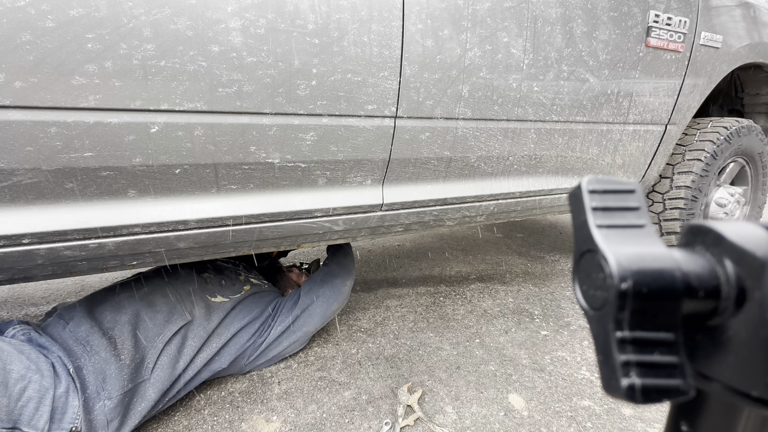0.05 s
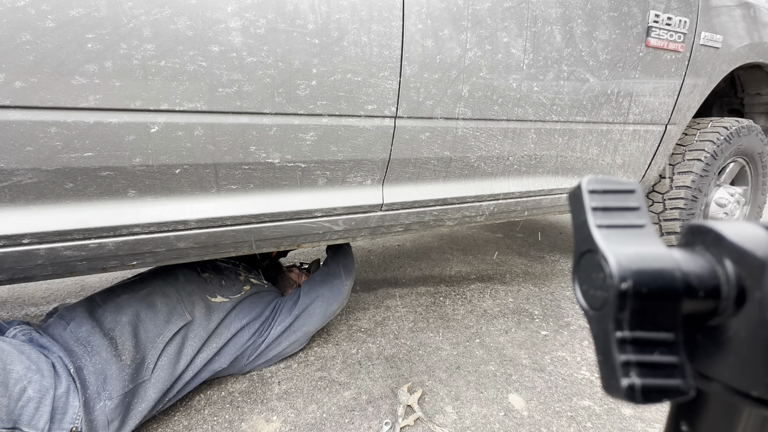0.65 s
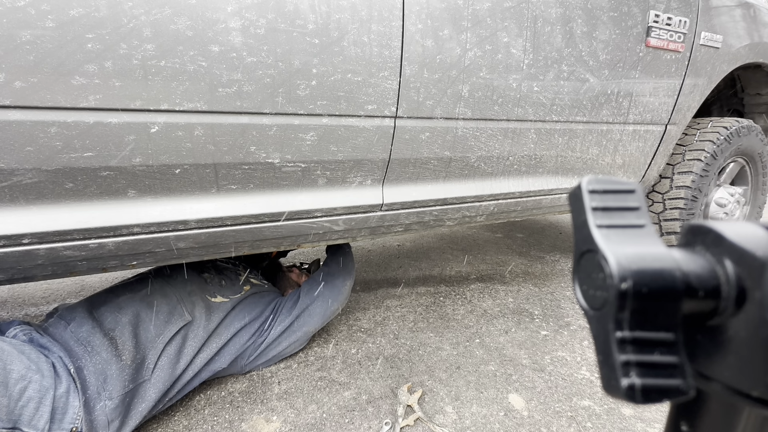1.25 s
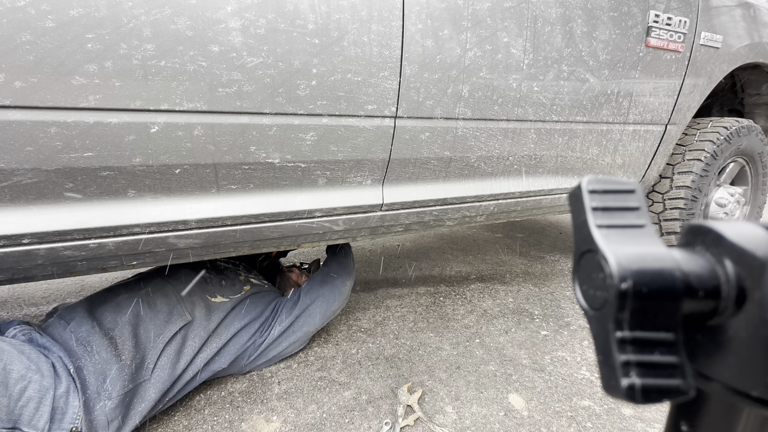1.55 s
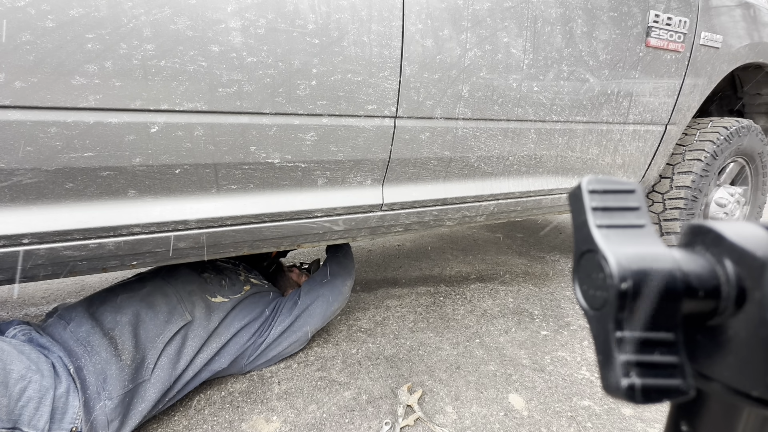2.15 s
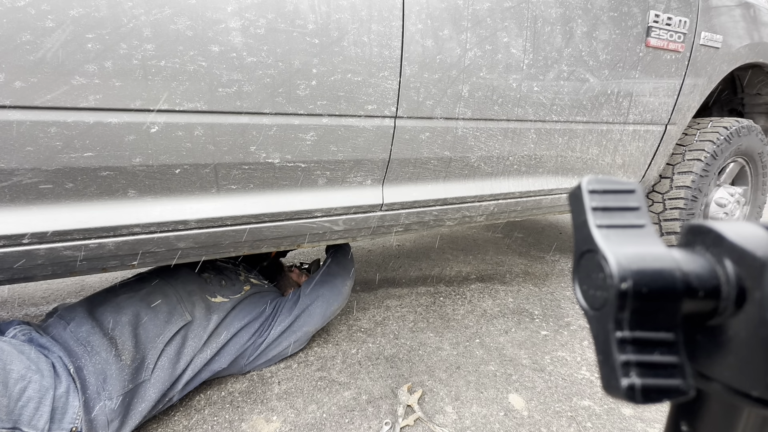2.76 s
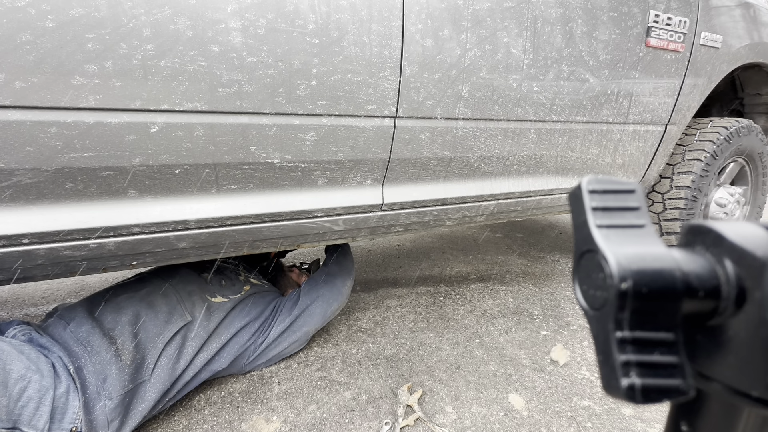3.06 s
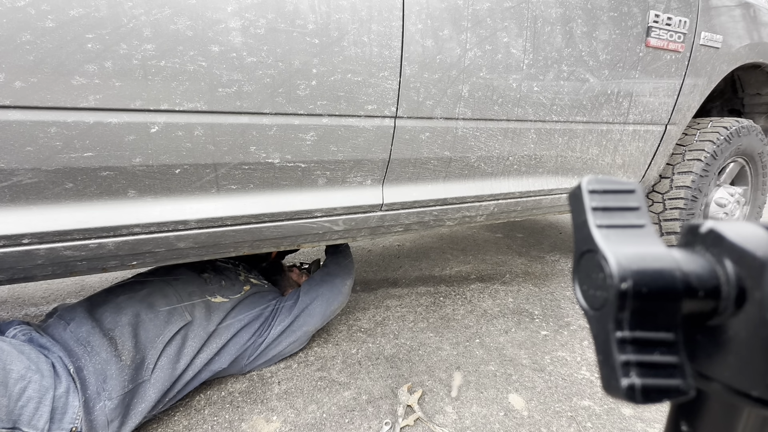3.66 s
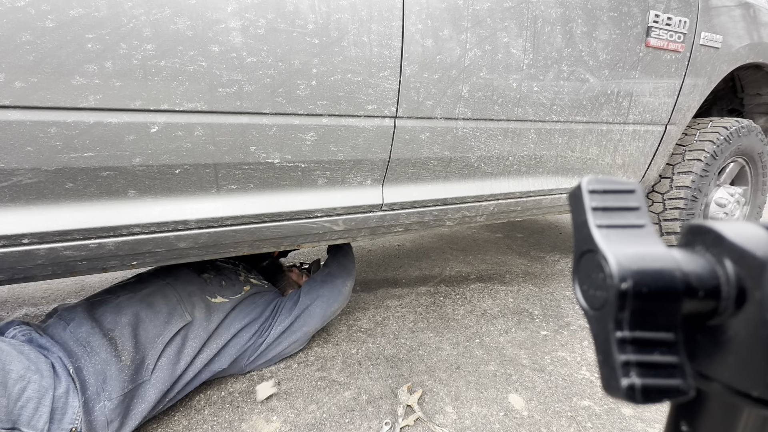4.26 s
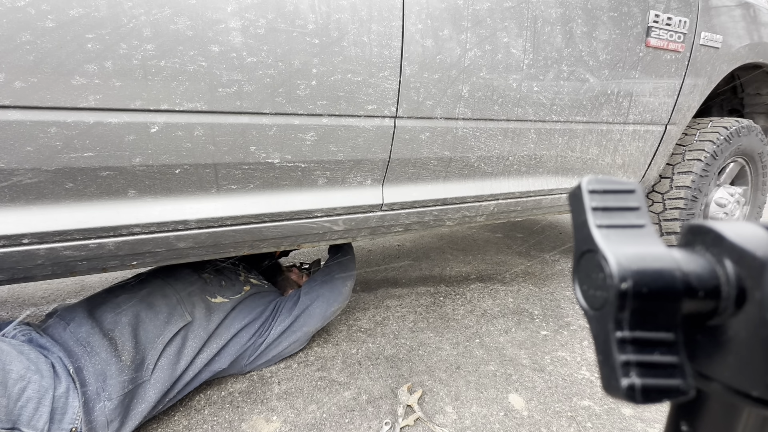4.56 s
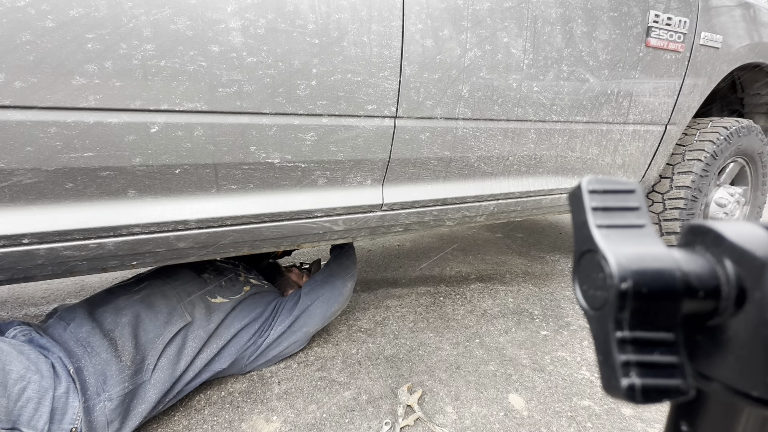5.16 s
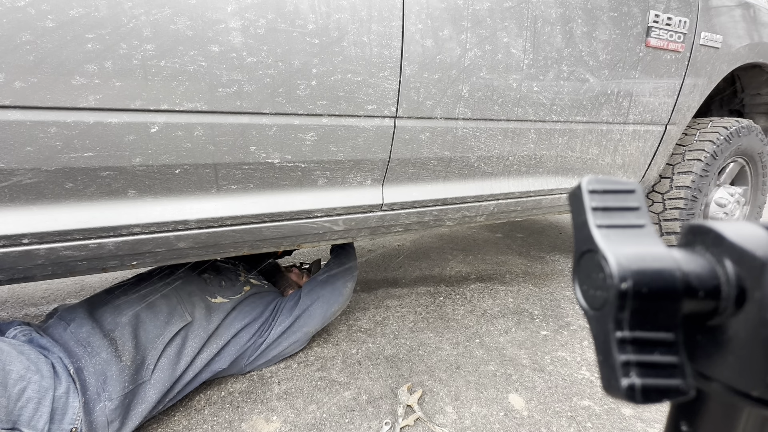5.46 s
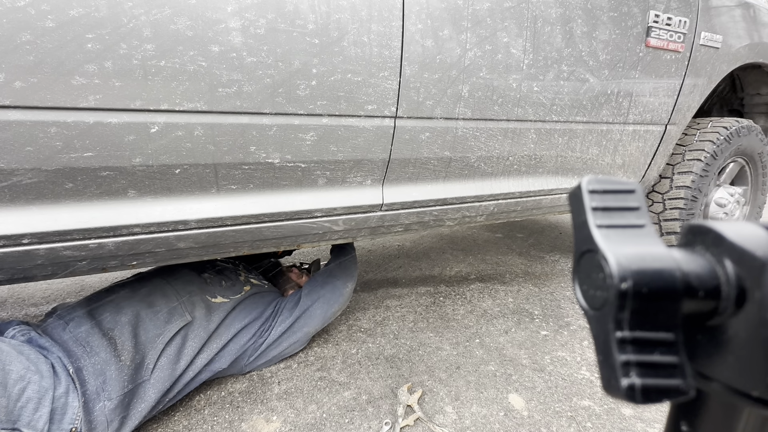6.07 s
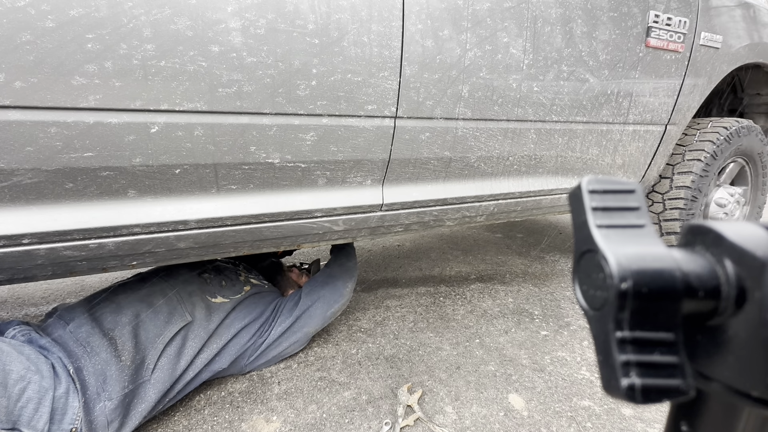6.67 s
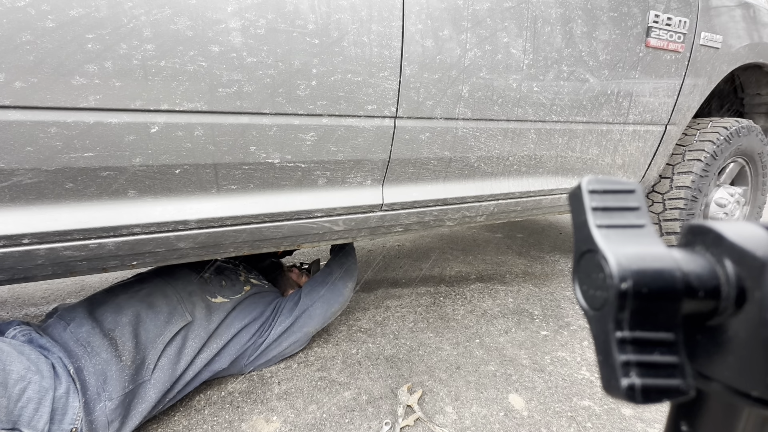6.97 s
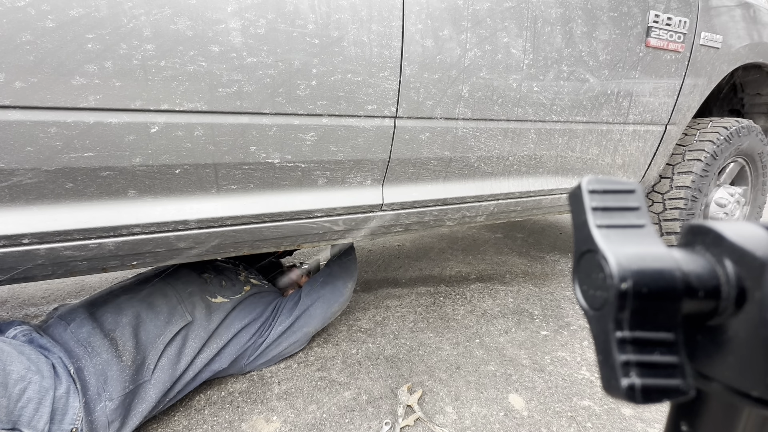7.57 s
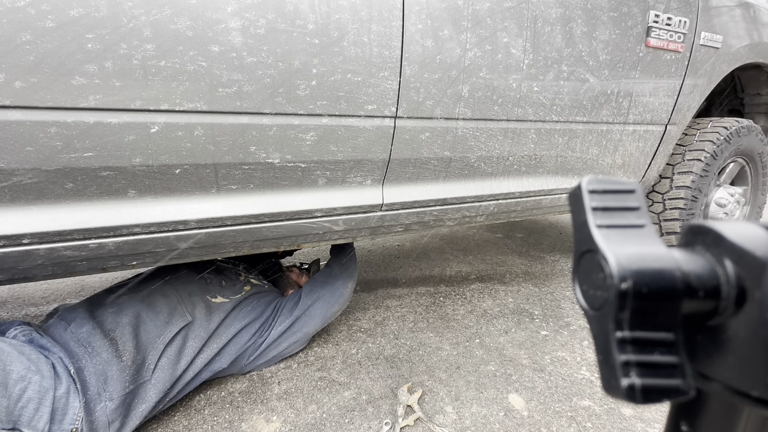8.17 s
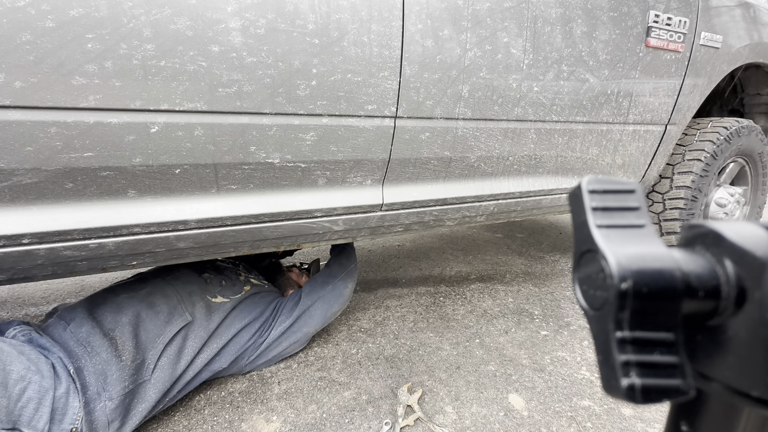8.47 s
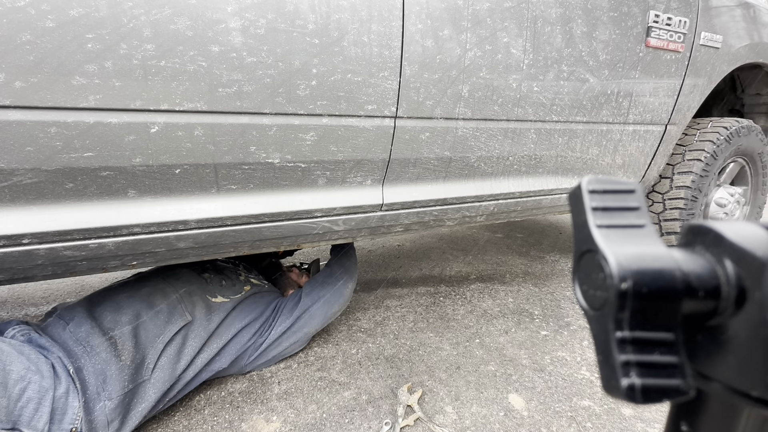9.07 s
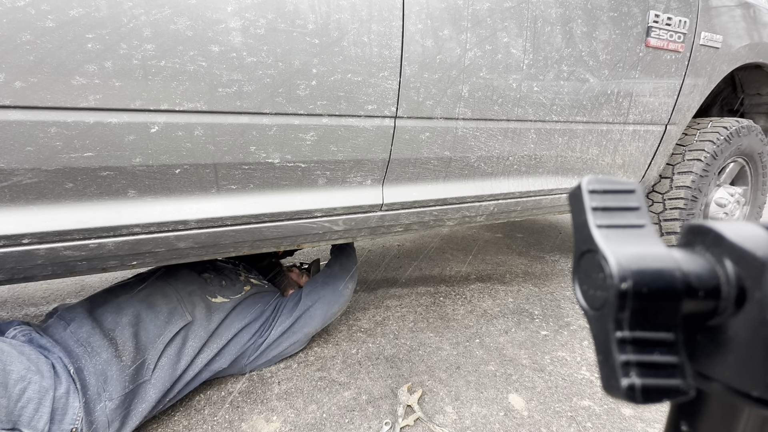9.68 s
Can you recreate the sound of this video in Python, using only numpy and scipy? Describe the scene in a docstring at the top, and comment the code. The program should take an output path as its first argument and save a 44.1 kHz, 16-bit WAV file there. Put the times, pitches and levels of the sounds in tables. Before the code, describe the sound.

Heard from beside a truck in a garage, a small saw grinds harshly into steel pipe, its motor slowing and recovering under load. It stops for about two seconds, leaving a metallic ring and some faint clicks. The saw restarts with a stutter, races up to a high squeal, then drops steadily in pitch as it rasps on. Light air rumbles faintly on the microphone.

```python
"""Power saw on a steel pipe

A small saw cuts a pipe under a parked truck. Its wheel rasps and knocks once a turn and slows as it
bites. It lifts off, grazes the pipe, which rings on, rests among a few light ticks, then spins up,
squeals and bogs down again. Each contact force is filtered by the resonances of the steel.
The underbody and the concrete scatter the sound; a light draught rumbles on the microphone."""
import sys
import numpy as np
from scipy import signal
from scipy.fft import rfft, irfft, next_fast_len
from scipy.io import wavfile
from scipy.ndimage import uniform_filter1d

SR = 44100
rng = np.random.default_rng(int(sys.argv[2]) if len(sys.argv) > 2 else 0)


def materialize(psi):
    """Save the field psi as 16-bit PCM at rate SR to the path in sys.argv[1].

    A 1-D psi becomes a single channel; in a 2-D psi each row is a channel.
    """
    bounded = np.clip(np.atleast_2d(psi).T, -1, 1)
    quanta = np.round(bounded * 32767).astype(np.int16)
    wavfile.write(sys.argv[1], SR, quanta)


N = 437031
T = np.arange(N) / SR
TOP_HZ = 15900  # band limit

# broad spectra of the three contact sounds: frequency_hz, density_db
RASP_SPECTRUM = [(1500, -31.5), (3000, -20), (4000, -15), (5000, -4.5), (5900, -6), (6700, -3), (7500, -1),
                 (8900, -7.5), (9700, -2), (10500, -14), (13000, -10.5), (15500, -13)]
CHATTER_SPECTRUM = [(600, -43.5), (1000, -10.5), (1400, -10.5), (1800, -11.5), (2300, -3), (2800, -6.5),
                    (3300, -7), (3700, -8.5), (4400, -9), (6500, -28)]
KNOCK_SPECTRUM = [(60, -33.5), (170, -21), (270, -19), (400, -18.5), (560, -9.5), (800, -1.5), (950, -9),
                  (1100, -10.5), (1400, -9.5), (2500, -49.5)]
# resonances of pipe and wheel, and of the pipe wall (first cut, grazes): centre_hz, width_hz, level_db
FIRST_STEEL_MODES = [(4180, 45, -3), (4398, 35, 2.5), (5297, 45, 3), (5445, 75, 3), (5830, 150, -2),
                     (6215, 100, 1), (7070, 60, 1), (7400, 70, 1), (7535, 50, 2), (8290, 190, 0),
                     (9400, 90, -1.5), (9750, 110, -4)]
FIRST_WALL_MODES = [(1385, 36, -6), (1650, 70, -.5), (1950, 130, -4), (2220, 130, -2.5), (2465, 24, 1.5),
                    (2868, 15, -1), (3700, 190, -2), (3860, 23, -2)]
# when the wheel is in the pipe: start_s, stop_s
FIRST_SPAN = (0, 2.994)
SECOND_SPAN = (5.405, 9.91)


def cut(speed, swell, span, steel, wall, body, steel_db, wall_db, body_db,
        rasp_db, chatter_db, knock_db, motor_db):
    """Forced vibration: chips rasp the steel, the rim chatters, a high spot knocks once a turn."""
    # part of the rasp's power that drives the squeal: time_s, share
    squeal_shares = [(6.42, 0), (6.53, .92), (6.68, .9), (6.78, .45), (6.92, .35), (6.99, .88), (7.08, .85),
                     (7.16, 0)]
    # motor and cooling fan shaking the pipe: shaft_multiple, level_db
    motor_orders = [(3, -11), (4, -11), (5, -6), (6, 0), (7, -4), (8, -4), (9, -8), (10, -8), (12, -6)]
    start, stop = span
    turns = np.cumsum(speed) / SR  # speed is in turns per second
    turns -= np.interp(start, T, turns)
    contact = (T >= start) * amp(-330 * np.clip(T - stop, 0, 1))
    hopping = np.clip((40 - speed) / 13, 0, 1)  # a slow wheel hops on the pipe
    seated = load(speed) * (1 - hopping)
    # speed and load set the levels, and how much repeats from turn to turn
    octaves = np.log2(speed / 60)
    steady = np.clip(seated * (.77 + .14 * octaves), 0, 1)
    rasp_swell_db, shake_swell_db = curves(swell)
    rasp = contact * amp(rasp_swell_db + 5 * octaves)
    chatter = contact * amp(shake_swell_db + 4 * octaves + 5 * (1 - seated) + hand_db())
    knock = contact * amp(shake_swell_db - 1.3 * octaves - 2 * (1 - seated) + hand_db())
    # the bite is hardest at the start of each turn
    hop_db = 3.5 + 15 * hopping
    bite = amp(hop_db * (1 - turns % 1) - 7 * hopping + .74 * wobble(35))
    edge, chips = rim(turns), grit(spiky_db=1.5)
    blows = high_spot(turns, scatter_s=15e-6, uneven_db=.5)
    # the lower the band, the more of it repeats
    scraping = blend(abrasive(turns, speed), grit(spiky_db=3), .7 * steady ** 2)
    hiss = sliding_resonances(rasp * bite * scraping, RASP_SPECTRUM, steel, steel_db)
    clatter = coloured(chatter * bite * blend(edge, chips, steady ** 2), CHATTER_SPECTRUM, wall, wall_db)
    pounding = blend(blows, bite * chips, 1 - (1 - steady) ** 2)
    thud = coloured(knock * pounding, KNOCK_SPECTRUM, body, body_db)
    honk = honks(contact * blend(blows, chips, 1 - (1 - steady) ** 3))
    singing = curves(squeal_shares)[0] * (T < stop)
    hiss = hiss * np.sqrt(1 - singing) + squeal(turns, rasp * np.sqrt(singing), speed)
    drone = coloured(knock * steady * shaft_tones(turns, motor_orders), KNOCK_SPECTRUM, body, body_db)
    return (amp(rasp_db) * hiss + amp(chatter_db) * clatter + amp(knock_db) * thud
            + amp(motor_db) * drone + honk)


def soft_start(speed, crawl_hz=26.8, ramp_start_s=5.66, octaves_per_s=2.75):
    """Exponential run-up: the motor crawls, then climbs to the speed that the cut allows."""
    return np.minimum(speed, crawl_hz * 2 ** (octaves_per_s * np.maximum(T - ramp_start_s, 0)))


def load(speed, free_octaves_per_s=2.7):
    """Cutting load, 0-1: a wheel gathers speed only when it is let off."""
    climb = uniform_filter1d(np.gradient(np.log2(speed)) * SR, size=SR // 8)
    return np.exp(-(np.maximum(climb, 0) / free_octaves_per_s) ** 2)


def hand_db():
    """Amplitude modulation: an unsteady hand makes the level waver."""
    return .6 * wobble(8)


def rim(turns, lowest_order=2, count=115, size=8192):
    """Periodic excitation: the edge's bumps recur each turn; rocking trades one flank for the other."""
    harmonics = np.pad(np.exp(2j * np.pi * rng.random((2, count))), ((0, 0), (lowest_order, 0)))
    inner, outer = irfft(harmonics, size)[:, (turns % 1 * (size - 1)).astype(int)]
    lean = .82 * wobble(3)
    return unit(np.cos(lean) * inner + np.sin(lean) * outer)


def abrasive(turns, speed, count=100):
    """Surface roughness: four grades of grit give a flat spectrum; the finest is heard at low speed."""
    grades = (np.clip((TOP_HZ + 1000 - order * speed) / 1000, 0, 1) * rim(turns, order, count)
              for order in range(0, 4 * count, count))
    return sum(grades) * np.sqrt(2 * count * speed / SR)


def grit(spiky_db):
    """Random excitation: countless tiny chips of uneven size add up to noise."""
    return unit(rng.standard_normal(N) * amp(spiky_db * wobble(2500)))


def high_spot(turns, scatter_s, uneven_db):
    """Impulse train: one blow for each turn of the wheel, at even mean power."""
    times = np.interp(np.arange(1, int(turns[-1])), turns, T)
    jitter = rng.standard_normal((len(times), 2))
    strength = np.sqrt(np.gradient(times) * SR) * amp(uneven_db * jitter[:, 0])
    place = (times + scatter_s * jitter[:, 1]) * SR
    taps = place.astype(int)[:, None] + np.arange(-7, 9)
    pulses = strength[:, None] * np.sinc(taps - place[:, None])  # blows fall between samples
    return np.bincount(np.clip(taps, 0, N).ravel(), pulses.ravel(), N + 1)[:N]


def sliding_resonances(x, spectrum, modes, modes_db, slide=.0035):
    """Changing boundary conditions: slot and grip shift the steel's resonances up and down a little."""
    low, high = (coloured(x, spectrum, [(hz * ratio, width, db) for hz, width, db in modes], modes_db)
                 for ratio in (1 - slide, 1 + slide))
    lean = .5 + .5 * np.tanh(1.5 * wobble(5))
    return lean * high + (1 - lean) * low


def squeal(turns, force, speed):
    """Friction-driven resonance: the racing rim squeals in the slot; at top speed it also screeches."""
    # broad spectrum of the squeal: frequency_hz, density_db
    spectrum = [(1200, -23), (2200, -17), (3300, -15), (4200, -11), (4900, -12), (5600, -5), (6700, -10),
                (7400, -5), (9300, -8), (12000, -17)]
    # steel resonances that it excites: centre_hz, width_hz, level_db
    modes = [(4010, 45, -5), (4400, 55, -5), (5420, 70, 4), (5830, 80, 2), (6200, 90, 0), (7110, 65, 4)]
    # the rim's strongest tones: shaft_multiple, level_db
    screech_orders = [(31, -5), (34, -3), (42, 0), (45, 1), (47, -1), (48, -2), (54, -1), (55, -1)]
    if not force.any():
        return 0
    racing = np.clip((speed - 117) / 11, 0, 1)
    singing = coloured(force * rim(turns), spectrum, modes)
    screech = force * racing * shaft_tones(turns, screech_orders)
    return amp(-.3) * singing + amp(-6) * screech


def shaft_tones(turns, orders):
    """Rotational harmonics: tones locked to the shaft, each swelling and fading on its own."""
    angle = (2 * np.pi * (turns % 1)).astype(np.float32)
    return unit(sum(amp(db + 2.1 * wobble(4)) * np.sin(round(order) * angle) for order, db in orders))


def honks(drive, edge_s=.036):
    """Band-pass resonance: for a spell during the cut, one band of the pipe's sound swells and honks."""
    # spells in which one band swells: start_s, length_s, level_db, centre_hz, width_hz
    spells = [(0, .37, -38.5, 820, 90), (.1, .33, -52, 300, 110), (.5, .5, -44, 735, 120),
              (.95, .45, -55, 255, 30), (1.15, .3, -39, 4410, 130), (1.42, .52, -40.5, 825, 80),
              (1.45, .4, -40, 2000, 350), (1.95, .15, -44, 780, 120), (2.12, .33, -36, 825, 120),
              (2.52, .3, -44, 730, 170), (6.7, .25, -38, 1700, 450), (6.73, .22, -30.5, 3800, 600),
              (7.2, .22, -38, 1570, 130), (7.25, .85, -36.5, 770, 80), (7.55, .5, -43, 560, 70),
              (7.65, .4, -37.5, 1385, 90), (8.05, .4, -42, 700, 120), (8.2, .27, -36.5, 2290, 200),
              (8.28, .26, -57, 228, 30), (8.52, .3, -44, 570, 70), (8.8, .2, -39, 2300, 160),
              (9.1, .52, -41.5, 770, 130), (9.26, .22, -51, 345, 30)]
    out = np.zeros(N)
    for start, length, db, hz, width_hz in spells:
        part = slice(max(int((start - .1) * SR), 0), int((start + length + .2) * SR))
        envelope = np.clip(np.minimum(T[part] - start, start + length - T[part]) / edge_s + .5, 0, 1)
        b, a = signal.iirpeak(hz, hz / width_hz, SR)
        ring = signal.lfilter(b, a, signal.lfilter(b, a, envelope * drive[part]))
        out[part] += amp(db) * np.sqrt(2 * SR / (np.pi * width_hz)) * ring
    return out


def grazes(rise_s=.0015):
    """Transient excitation: the wheel catches the pipe; the briefer the catch, the quicker it fades."""
    # catches of the wheel: start_s, length_s, rasp_db, chatter_db, knock_db
    catches = [(1.317, 0.0012, -23, -22, -62), (3.121, 0.0076, -46, -38.5, -37),
               (3.211, 0.018, -45, -46, -48), (3.231, 0.036, -27, -35.5, -50),
               (3.278, 0.012, -25, -38, -50), (3.295, 0.013, -44, -37.5, -55),
               (5.269, 0.019, -53.5, -55.5, -51), (5.36, 0.022, -68, -69, -74),
               (5.59, 0.0066, -32, -48, -60), (5.634, 0.0064, -27.5, -37, -61),
               (5.749, .004, -22, -38, -64), (5.778, 0.0091, -23.5, -33, -64),
               (5.845, 0.0012, -17, -27, -62), (5.954, .002, -24, -44, -62), (6.02, 0.0022, -20, -37, -62),
               (6.81, .002, -23, -24.5, -50)]
    power, t = np.zeros((3, N)), T[:SR // 4]
    for start, length, *levels_db in catches:
        fall_db_per_s = 400 * (1 + .004 / length)
        shape = np.clip(t / rise_s, 0, 1) * amp(-fall_db_per_s * np.maximum(t - length, 0))
        power[:, round(start * SR):][:, :len(t)] += (amp(levels_db)[:, None] * shape) ** 2
    rasp, chatter, knock = np.sqrt(power) * grit(spiky_db=4)
    return (coloured(rasp, RASP_SPECTRUM, FIRST_STEEL_MODES)
            + coloured(chatter, CHATTER_SPECTRUM, FIRST_WALL_MODES) + coloured(knock, KNOCK_SPECTRUM))


def ringing(drive):
    """Free vibration: the pipe's lightly damped modes store the scraping's energy and ring on."""
    # modes of the pipe: pitch_hz, level_db, t60_s
    modes = [(1647, -39, 1.2), (2040, -40, 4), (2315, -36, 1), (2385, -32.5, 3.3), (2466, -30, 1.9),
             (3655, -25.5, .7), (4404, -24, .3), (4619, -22, .45), (5389, -30, .33), (6266, -26, .48),
             (7601, -24, .45), (8540, -26, .35)]
    t = T[:2 * SR]
    response = sum(amp(db - 60 * t / t60) * np.sin(2 * np.pi * hz * t) / np.sqrt(t60 * SR)
                   for hz, db, t60 in modes)
    return amp(3) * signal.oaconvolve(drive, response)[:N]


def ticks():
    """Impact noise: shifting the tool makes small dry contacts, each with a short scrape."""
    # contacts: start_s, level_db, body_relative_db
    contacts = [(3.7497, -42.5, -13), (3.7798, -56.5, -21), (3.8214, -61, -9), (3.9948, -63.5, -11.5),
                (4.06, -48, -24), (4.2682, -53, -15.5), (4.3244, -58, -17), (4.4404, -60.5, -12.5),
                (4.5914, -61, -9), (4.7704, -46.5, -23), (4.8384, -63, -6), (4.9157, -59, -1),
                (5.0434, -70.5, -10), (5.1118, -49.5, -22), (5.1344, -65, -9), (5.241, -44, -12)]
    # bright spectrum of a contact: frequency_hz, density_db
    tip_spectrum = [(800, -27), (2500, -6), (4500, -2), (8000, 2), (10000, 2), (15000, -8)]
    tip, body = np.zeros((2, N))
    t = T[:SR // 8]
    decay = amp(-60 * t / .014) + .15 * amp(-60 * t / .05)
    for start, db, body_db in contacts:
        tick = amp(db) * decay * rng.standard_normal(len(t))
        tip[round(start * SR):][:len(t)] += amp(-4.5) * tick
        body[round(start * SR):][:len(t)] += amp(body_db) * tick
    return coloured(tip, tip_spectrum) + coloured(body, CHATTER_SPECTRUM)


def reflections(x, direct_db, underbody_db, underbody_t60_s, garage_db):
    """Scattering and reverberation: dense early echoes off the underbody, then the garage's tail."""
    # reverberation time of the garage: frequency_hz, t60_s
    garage_decay = [(200, 0.89), (1500, 0.45), (5000, 0.39), (9000, 0.24), (15000, 0.15)]
    t = T[:SR // 2]
    scatter = rng.standard_normal((2, len(t))) * amp(-60 * t / underbody_t60_s)
    near = amp(underbody_db) * scatter / np.linalg.norm(scatter[0])
    near[[0, 1], [0, 22]] += amp(direct_db)  # the left port hears the saw 22 samples sooner
    # the many near paths smear the phase but leave the colour even
    response = rfft(near)
    colour = np.sqrt(uniform_filter1d(abs(response) ** 2, size=12, axis=1))
    near = irfft(response / colour)[:, :len(t) // 2]
    out = signal.oaconvolve(x[None], near, axes=1)[:, :N]
    # the far field is diffuse: its paths keep trading strength
    hz, frame_s, noise = signal.stft(rng.standard_normal((2, 2, len(t))), SR, nperseg=256)
    decay = amp(-60 * frame_s / along(garage_decay, hz)[:, None])
    tails = signal.istft(noise * decay, SR, nperseg=256)[1]
    drift = 2 * np.pi * T + wobble(3)
    for tail, weight in zip(tails, [np.cos(drift), np.sin(drift)]):
        far = signal.oaconvolve((x * weight)[None], tail / np.linalg.norm(tail[0]), axes=1)
        out += amp(garage_db) * far[:, :N]
    return out


def draught(calm_db=-68, stirred_db=-70.5, rise_s=.0076, fall_db_per_s=136):
    """Incoherent addition: calm air, air stirred by the saw and puffs sum in power to a level in dB."""
    # puffs of air on the microphone: start_s, length_s, level_db
    puffs = [(3.24, 0.16, -59), (3.7, 0.35, -61), (4.21, 0.25, -55.5), (5.5, 0.83, -59.5),
             (6.2, 0.79, -54.5), (6.32, 0.065, -50), (6.48, 0.016, -44), (8.0, 0.13, -58.5),
             (8.5, 0.44, -57.5)]
    stirred = [(start, stop - start, stirred_db) for start, stop in (FIRST_SPAN, SECOND_SPAN)]
    power = amp(calm_db) ** 2
    for start, length, db in puffs + stirred:
        onset = np.clip((T - start) / rise_s, 0, 1)
        power = power + onset * amp(db - fall_db_per_s * np.maximum(T - start - length, 0)) ** 2
    return 10 * np.log10(power)


def background():
    """Turbulence: air buffets each microphone port on its own, brighter when stronger, over a hush."""
    # spectra of the draught's rumble, its gusts and the even hush: frequency_hz, density_db
    rumble = [(20, -26.5), (35, -22.5), (55, -2.5), (85, -4), (130, -10.5), (220, -16.5), (350, -29),
              (800, -65)]
    gust = [(50, -23), (110, -5.5), (200, 4), (300, -6), (600, -42)]
    hush = [(88, -38), (150, -1), (500, -3.5), (595, -5.5), (1910, -16.5), (4140, -27.5), (8490, -31.5),
            (9920, -37.5), (11600, -48.5), (15500, -44)]
    draught_db = draught()
    gust_db = -58 + 1.9 * (draught_db + 52.5)
    noise = lambda spectrum, db: amp(db) * coloured(rng.standard_normal(N), spectrum)
    buffet = lambda: amp(3.2 * wobble(27)) * (noise(rumble, draught_db) + noise(gust, gust_db))
    left = amp(6) * buffet() + noise(hush, -66.5)
    right = amp(.5) * buffet() + noise(hush, -67.5)
    return np.array([left, right])


def coloured(x, spectrum, modes=(), modes_db=0, size=8192):
    """Minimum-phase filter: a broad spectrum with resonances on top; white noise keeps its level."""
    hz = np.fft.rfftfreq(size, 1 / SR)
    power = amp(along(spectrum, hz)) ** 2
    for centre, width, db in modes:
        power = power + amp(db + modes_db) ** 2 / (1 + ((hz - centre) / width) ** 2) ** 2
    cepstrum = irfft(np.log(power / power.mean() + 1e-12) / 2)
    causal_fold = 1 + np.sign(size // 2 - np.arange(size))
    causal_fold[0] = 1
    return signal.oaconvolve(x, irfft(np.exp(rfft(cepstrum * causal_fold))))[:N]


def blend(regular, loose, share):
    """Equal-power mix, with the given share of the power in the regular signal."""
    return np.sqrt(share) * regular + np.sqrt(1 - share) * loose


def wobble(knots_per_s):
    """Random modulation: straight lines between random knots, at unit RMS."""
    knots = rng.standard_normal(int(N * knots_per_s / SR) + 2)
    return unit(np.interp(T * knots_per_s, np.arange(len(knots)), knots))


def curves(rows):
    """Interpolation in time: one value per sample for each column after the first."""
    times, *columns = np.transpose(rows)
    return np.array([np.interp(T, times, column) for column in columns])


def along(points, hz):
    """Interpolation of (frequency_hz, value) points on a log frequency axis."""
    point_hz, values = np.transpose(points)
    return np.interp(np.log(hz + 1), np.log(point_hz + 1), values)


def amp(db):
    """Decibels to amplitude."""
    return np.exp(np.asarray(db) * (np.log(10) / 20))


def unit(x):
    """Normalisation to unit RMS."""
    return x / np.sqrt(np.mean(x ** 2) + 1e-20)


def scene():
    """Superposition: two cuts with grazes and ticks between them, heard from beside the truck."""
    # wheel speed, sagging as the wheel bites: time_s, turns_per_s
    first_speed = [(0, 60.3), (.17, 58.5), (.27, 58.4), (.37, 56.8), (.52, 50.2), (.62, 50.9), (.72, 48.5),
                   (.84, 47.8), (1.12, 41.3), (1.21, 41.6), (1.29, 44.9), (1.37, 44.5), (1.53, 59.3),
                   (1.6, 60), (1.82, 54.8), (1.9, 54.8), (2.07, 52.3), (2.15, 54), (2.42, 53.6),
                   (2.8, 48.2), (3.0, 44.5)]
    second_speed = [(6.48, 128), (6.57, 130), (6.67, 129.2), (6.82, 122.7), (6.92, 115), (7.0, 112.7),
                    (7.1, 113.2), (7.2, 101.5), (7.28, 102.3), (7.62, 95.5), (7.7, 92.9), (8.02, 89.6),
                    (8.33, 76), (8.45, 75.3), (8.8, 67), (9.04, 64.7), (9.15, 59.5), (9.37, 57),
                    (9.47, 59.2), (9.6, 59), (9.7, 65), (9.82, 80.5)]
    # slow swells on top of what the speed gives: time_s, rasp_db, chatter_and_knock_db
    first_swell = [(0, -3, -0.5), (.22, -0.5, 1), (0.499, -0.5, 0), (1.1, -0.5, 2), (1.65, 0.5, 1),
                   (2.3, -2, -1.5), (2.6, -1.5, 0.5), (3.0, -2.5, 2)]
    second_swell = [(5.405, -15.5, -11.5), (5.7, -5.5, -5.5), (6.0, -2, -4.5), (6.519, 1.5, -0.5),
                    (6.87, 1.5, 0.5), (7.08, -2, -1), (7.6, -1, 0.5), (8.28, 0.5, 1.5), (8.55, 0, 1),
                    (8.9, 0, 1), (9.91, -1, -1)]
    # low resonances of the pipe and its hangers: centre_hz, width_hz, level_db
    first_body = [(195, 13, -12.5), (247.3, 51, -13.5), (573, 20, -3), (713, 46, -3), (820, 41, 4),
                  (1047, 58, -8.5)]
    second_body = [(224.7, 13, -10.5), (344, 4.4, -8), (469, 20, -6), (552.5, 10.6, 3.5), (711, 14, 4.5),
                   (790, 45, 2), (1000, 49, -3), (1136, 38, -1)]
    # resonances of pipe and wheel, and of the pipe wall: centre_hz, width_hz, level_db
    second_steel = [(4400, 55, -2), (5400, 90, 3.5), (5790, 120, 3), (6230, 90, 2), (7108, 40, 8),
                    (7365, 60, 4), (7540, 70, 4), (8400, 170, 1.5), (9340, 110, 0), (9850, 110, -1),
                    (14000, 2200, -7.5)]
    second_wall = [(1378, 24, -2), (1645, 60, -2.5), (1940, 38, -2), (2270, 170, -1), (2865, 22, 0),
                   (3080, 65, -1), (3558, 22, 5), (4018, 25, 4)]
    first = cut(curves(first_speed)[0], first_swell, FIRST_SPAN,
                FIRST_STEEL_MODES, FIRST_WALL_MODES, first_body, steel_db=-1.5, wall_db=.5, body_db=-.5,
                rasp_db=-23.5, chatter_db=-36, knock_db=-40, motor_db=-52.5)
    second = cut(soft_start(curves(second_speed)[0]), second_swell, SECOND_SPAN,
                 second_steel, second_wall, second_body, steel_db=-2.5, wall_db=-1, body_db=-3,
                 rasp_db=-22, chatter_db=-34, knock_db=-39, motor_db=-53.5)
    saw = first + second + amp(3) * grazes()
    sources = saw + ringing(saw) + amp(1.5) * ticks()
    heard = reflections(sources, direct_db=-5, underbody_db=-1.5, underbody_t60_s=.097, garage_db=-8.5)
    return heard + background()


def record(dry):
    """Filtering and saturation: the ports absorb a treble band, peaks are rounded, the top is cut."""
    size, headroom = next_fast_len(N + SR // 2), .85
    hz = np.fft.rfftfreq(size, 1 / SR)
    port_db = -24 * np.exp(-((hz - 11400) / 850) ** 2)
    low_pass = 1 / np.sqrt(1 + (hz / TOP_HZ) ** 200)
    heard = irfft(rfft(dry, size) * amp(port_db), size)
    rounded = heard / (1 + (heard / headroom) ** 6) ** (1 / 6)
    return irfft(rfft(rounded) * low_pass, size)[:, :N]


dry = scene()
out = record(dry)
materialize(out)
```